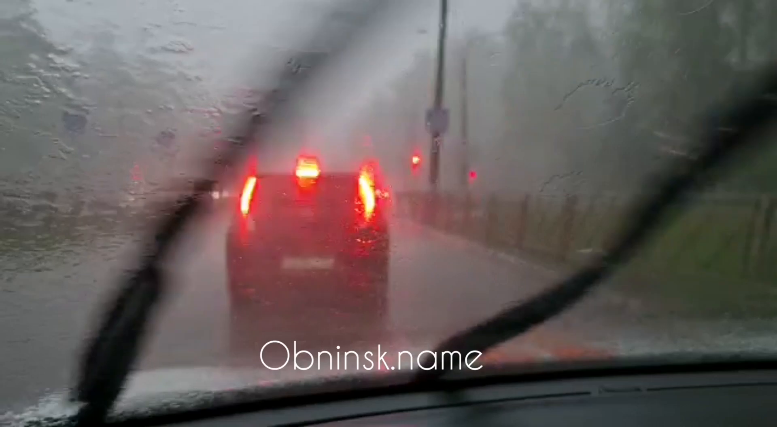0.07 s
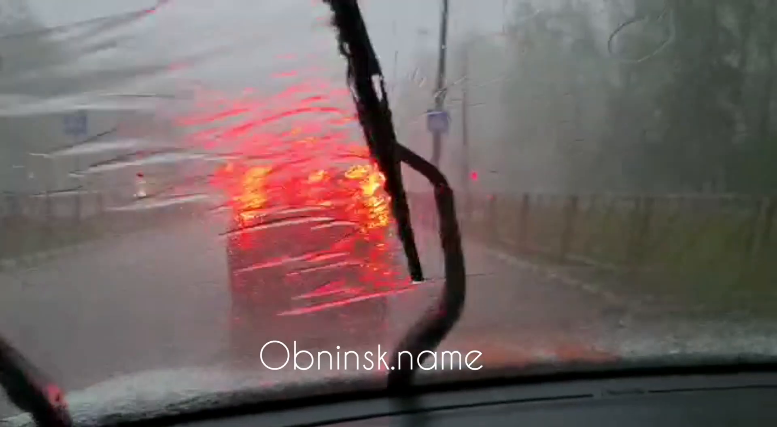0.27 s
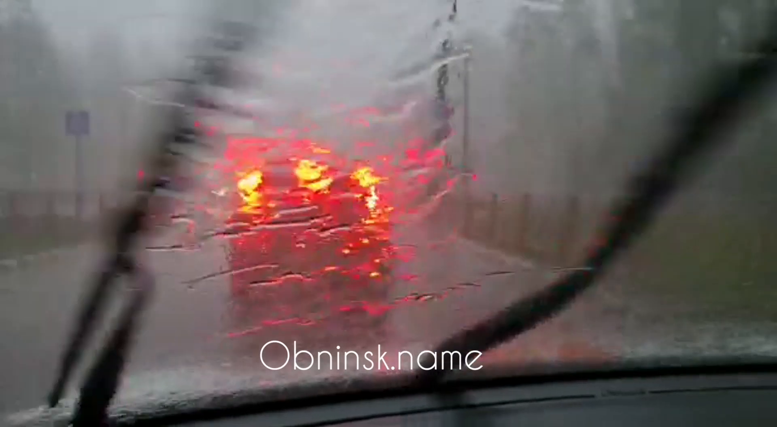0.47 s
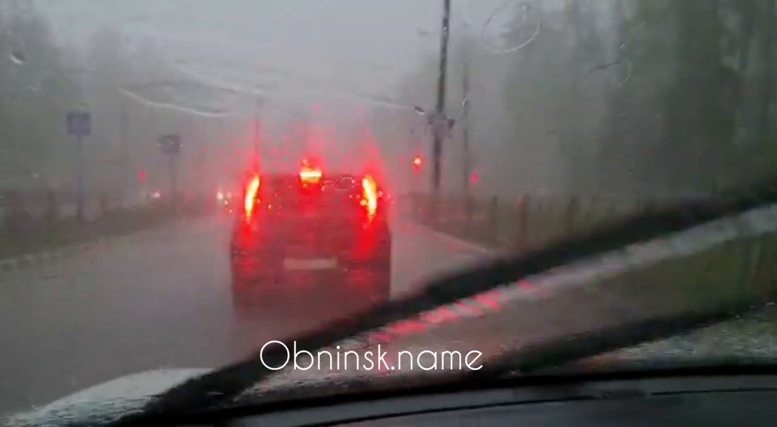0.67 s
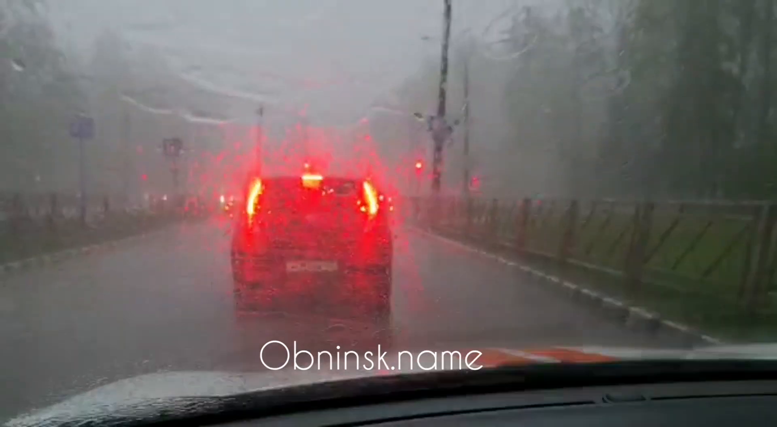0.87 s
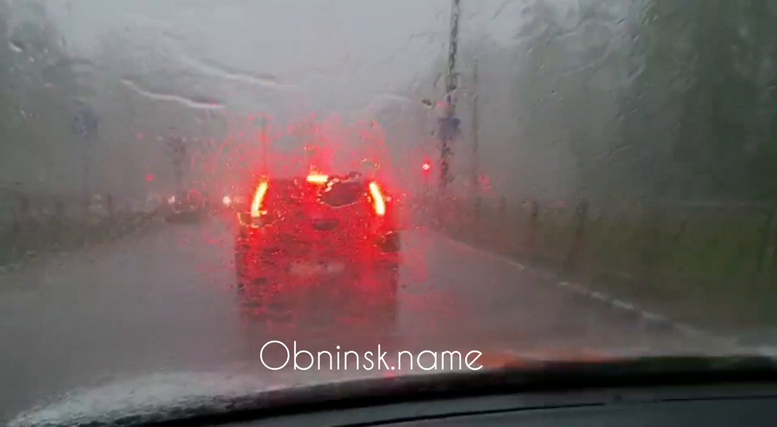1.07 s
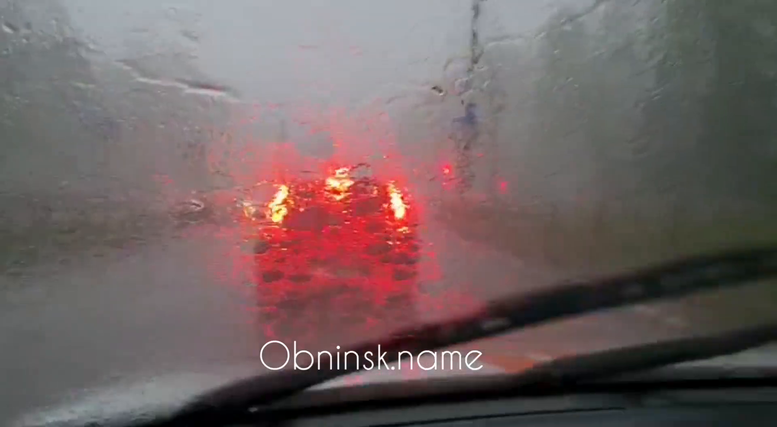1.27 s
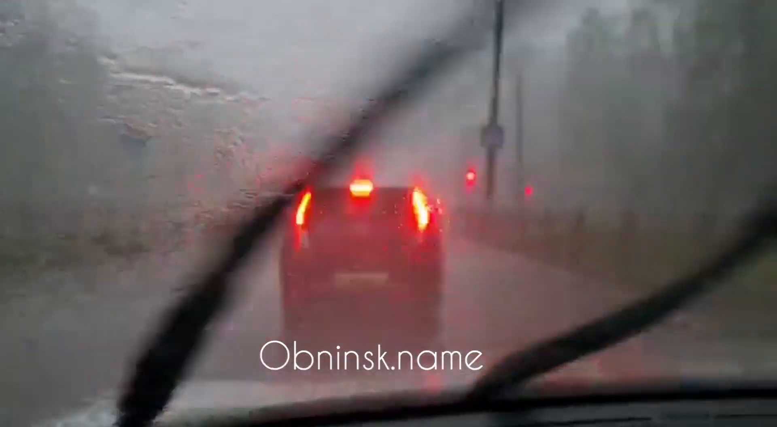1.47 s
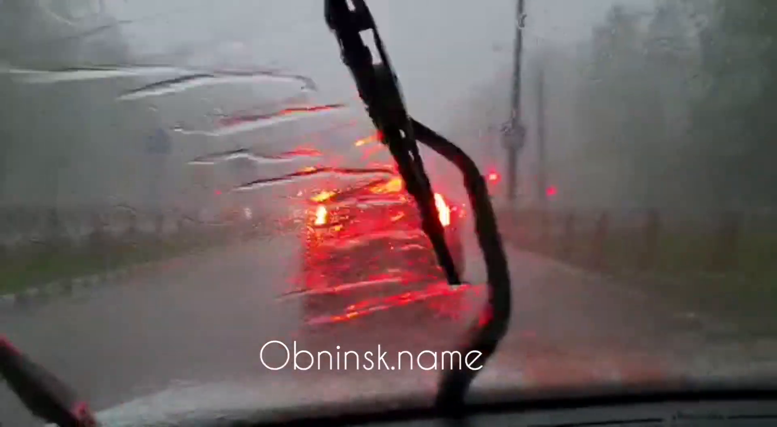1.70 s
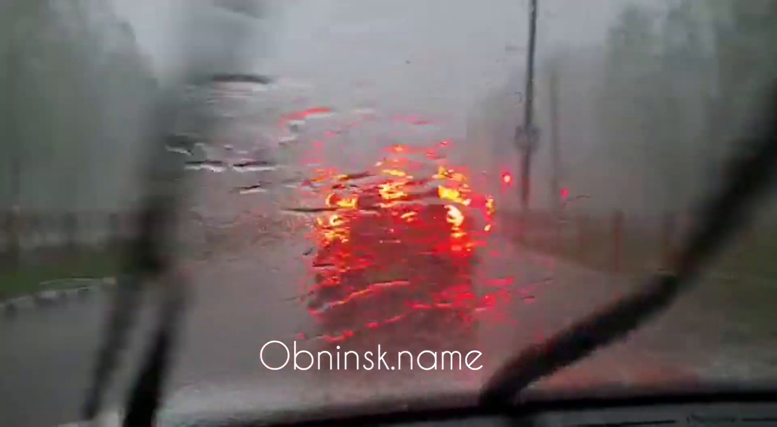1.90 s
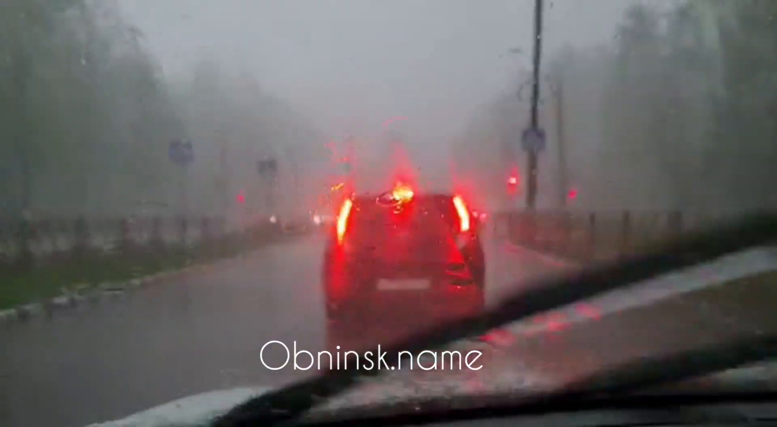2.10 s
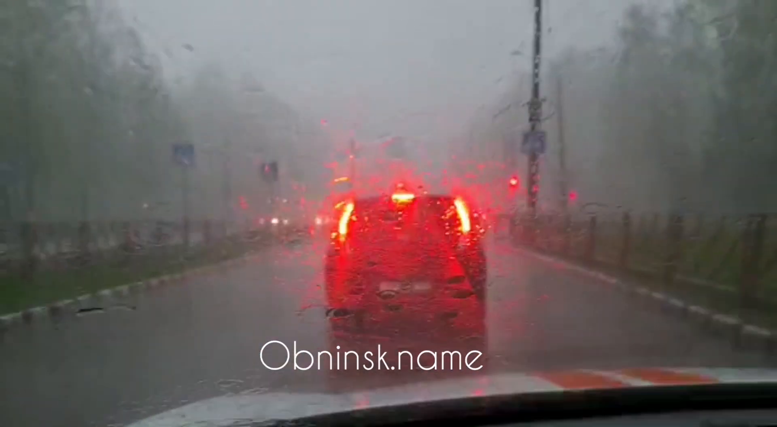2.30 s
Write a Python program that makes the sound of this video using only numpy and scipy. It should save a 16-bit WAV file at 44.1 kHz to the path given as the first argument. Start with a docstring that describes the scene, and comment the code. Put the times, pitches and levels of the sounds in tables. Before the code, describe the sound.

Heavy rain on a car, heard inside the cabin, starts abruptly at about 0.07 s: dense bright patter on glass and hollow roof drumming. From 0.6 s it thins, nearly stopping around 0.9 s with separate ticks, then surges back at 1.0 s and gradually softens to the end. Dull wiper thumps fall near 0.35, 1.06 and 1.8 s, over wavering engine hum, road rumble and faint wet hiss.

```python
"""Heavy rain on a slowly moving car, heard from inside the cabin; it thins for a moment and returns.
Random drops patter on the windshield and drum on the roof: each is a click, a crack and a short ring.
Single heavy drops tick and knock on the glass, and the wipers thump at each turn (fading low tones).
Underneath, the engine hums (two wavering tones), the road rumbles and the wet street hisses (noise)."""
import sys
import numpy as np
from scipy import signal
from scipy.fft import rfft, irfft
from scipy.io import wavfile

SR = 44100
rng = np.random.default_rng(int(sys.argv[2]) if len(sys.argv) > 2 else 0)


def wav_record(signal):
    """Record a signal, one row per channel, as 16-bit PCM in the file named by sys.argv[1]."""
    frames = np.transpose(np.atleast_2d(signal))
    bounded = np.clip(frames, -1, 1)
    # unit amplitude maps onto the largest positive 16-bit level
    quanta = np.round(bounded * 32767).astype(np.int16)
    wavfile.write(sys.argv[1], SR, quanta)


N = 103546
TIME = np.arange(N) / SR

# Strength of the rain over time, before each layer's own level is added:
# start_s, windshield_db, roof_db, fine_spatter_db, low_roof_boom_db
RAIN_STRENGTH = [(0.07, -30.0, -27.5, -42.5, -34.5), (0.18, -30.0, -29.5, -46.0, -35.0),
                 (0.27, -27.0, -27.5, -41.0, -34.5), (0.38, -28.0, -26.5, -44.0, -35.5),
                 (0.5, -29.5, -26.0, -45.0, -32.0), (0.58, -31.5, -31.0, -45.0, -37.0),
                 (0.67, -35.5, -31.5, -55.0, -37.0), (0.76, -39.0, -37.5, -54.0, -42.5),
                 (0.84, -39.5, -34.5, -56.5, -44.5), (0.92, -45.5, -45.0, -62.5, -44.5),
                 (1.02, -29.0, -34.0, -40.5, -36.0), (1.1, -29.0, -28.5, -42.0, -33.5),
                 (1.44, -31.0, -30.5, -43.5, -37.5), (1.62, -33.0, -33.5, -47.0, -37.5),
                 (1.86, -33.5, -36.0, -44.5, -35.0), (2.08, -34.5, -36.0, -47.5, -43.0),
                 (2.19, -33.5, -34.5, -45.0, -39.5), (2.33, -39.5, -35.0, -53.5, -41.5)]
# Colour of the fine spatter, also used for the ticks of big drops: frequency_hz, relative_level_db
SPATTER_COLOUR = [(200, -23), (1200, -14.5), (3300, 13), (4800, 4), (6000, 3), (7600, -1), (9000, 1.5),
                  (10500, -4), (12700, -1.5), (14000, -6), (16000, -3)]

ROOF_SPREAD_DB, ROOF_RING_DB = 1.5, 0.5  # variety of drop sizes; ring of the roof, shared with its boom


def gain_of(db):
    """Turns decibels into a plain multiplier."""
    return 10 ** (np.asarray(db) / 20)


def evened(x):
    """Scales a sound so that its average strength (rms) is 1."""
    return x / np.sqrt(np.mean(x ** 2) + 1e-20)


def read(points, hz):
    """Reads a frequency table in between its points, on a logarithmic frequency axis."""
    f, value = np.transpose(points)
    return np.interp(np.log(hz + 1), np.log(f + 1), value)


def curve(rows, order):
    """Draws one column of a time table as a smooth line, sample by sample."""
    rows = np.array(rows)
    return np.interp(TIME, rows[:, 0], rows[:, order])


def add(mix, s, sound):
    """Mixes a sound in at a time in seconds, cutting off what runs past the end."""
    part = mix[:, round(s * SR):][:, :sound.shape[-1]]
    part += sound[..., :part.shape[1]]


def coloured(x, spectrum, size=4096):
    """Filters with the given spectrum; the filter never sounds ahead of its input and has unit energy."""
    hz = abs(np.fft.fftfreq(size, 1 / SR))
    log_gain = np.log(gain_of(read(spectrum, hz)))
    # the Hilbert transform supplies the phase that puts the energy as early as possible
    response = np.exp(np.conj(signal.hilbert(log_gain)))
    taps = np.fft.ifft(response).real
    taps = taps / np.linalg.norm(taps)
    return signal.oaconvolve(x, taps[None], axes=1)[:, :N]


def paired(x):
    """Blends two unrelated channels so that they become alike, mostly in the bass."""
    # frequency_hz, left_right_likeness (0 to 1)
    likeness = [(30, 0.65), (120, 1), (250, 0.94), (450, 0.39), (800, 0.22), (1500, 0), (16000, 0.055)]
    z, hz = rfft(x), np.fft.rfftfreq(x.shape[1], 1 / SR)
    angle = np.arcsin(np.clip(read(likeness, hz), -1, 1)) / 2
    blend = np.cos(angle) * z + np.sin(angle) * z[::-1]
    return irfft(blend, x.shape[1])


def impact(ring_db, size=6144):
    """One spot struck by a drop: direct click, brief crack of the panel, ring of the cabin; unit energy."""
    # How long panel and cabin ring: frequency_hz, time_to_fade_60_db_s
    ring_time = [(60, 0.18), (350, 0.39), (1000, 0.024), (3000, 0.042), (8000, 0.067), (16000, 0.075)]
    lag_s, lag_spread_s = .00043, .00012
    crack_decay_s, crack_db, direct_db = 0.0021, -1, -4.0
    t = np.arange(size) / SR

    # the far side hears the drop a little later
    lag = lag_s * rng.choice([-1, 1]) + lag_spread_s * rng.standard_normal()
    age = t - np.array([[abs(lag) + lag], [abs(lag) - lag]]) / 2
    direct = np.sinc(age * SR) * gain_of(direct_db)
    crack = evened(rng.standard_normal((2, size)) * (age > 0) * np.exp(-t / crack_decay_s))

    # the ring is noise that fades at its own speed in every frequency band
    hz, when, z = signal.stft(rng.standard_normal((2, size)), SR, nperseg=128)
    t60 = read(ring_time, hz)[:, None]
    fading = z * gain_of(-60 * when / t60) / np.sqrt(t60)
    ring = signal.istft(fading, SR)[1][:, :size]

    diffuse = paired(gain_of(crack_db) * crack + gain_of(ring_db) * evened(ring))
    return evened(direct + diffuse / np.sqrt(size)) / np.sqrt(size)


def shower(level_db, per_s, spread_db, ring_db, spectrum, count=20):
    """Random drops on many spots of a panel; in a lull they are both fewer and softer."""
    thinning = .33  # share of a lull that comes from fewer drops
    density = gain_of(level_db - level_db.max()) ** (2 * np.clip(thinning, 0, 1))
    chance, spot = rng.random(N), rng.integers(0, count, N)
    size_db = spread_db * np.minimum(rng.exponential(1, N), 3.6)
    size = gain_of(size_db) * rng.choice([-1, 1], N)
    # per_s is the number of drops per second at the height of the downpour
    falls = chance < density * per_s / SR
    drops = evened(size * falls / np.sqrt(density)) * gain_of(level_db)

    hits = np.zeros((2, N))
    for k in range(count):
        on_this_spot = (drops * (spot == k))[None]
        hits += signal.oaconvolve(on_this_spot, impact(ring_db), axes=1)[:, :N]
    return coloured(hits, spectrum)


def road():
    """Tyre rumble through the body: steady noise, strongest in the bass."""
    # frequency_hz, relative_level_db
    road_colour = [(10, 6), (26, -29), (48, 17.5), (70, 1), (115, 3.5), (200, -11.5), (400, -7.5),
                   (1000, -18.5), (3000, -43), (16000, -103)]
    level_db = -39.0
    return gain_of(level_db) * evened(coloured(paired(rng.standard_normal((2, N))), road_colour))


def wash():
    """Smooth hiss of the rain on the street, muffled by the windows: steady filtered noise."""
    # frequency_hz, relative_level_db
    wash_colour = [(100, -4), (500, 5), (1500, -9), (3200, -1.5), (5000, -25), (9000, -29), (11000, -31),
                   (16000, -30)]
    level_db = -49.5
    return gain_of(level_db) * evened(coloured(rng.standard_normal((2, N)), wash_colour))


def engine():
    """Engine hum: a wavering firing tone and a second tone at half its pitch."""
    # Hum in the cabin before the overall hum level is added: start_s, level_db
    hum_level = [(0.07, -29), (0.32, -40), (0.37, -22), (0.41, -35), (0.56, -25.5), (0.59, -44),
                 (0.73, -30), (0.95, -49), (0.96, -33.5), (1.92, -40), (1.99, -30), (2.02, -48), (2.3, -35),
                 (2.34, -39)]
    firing_hz, hum_db, half_order_db = 46.46, -3, -0.5
    wander_share = 0.027  # typical (rms) pitch drift as a share of the firing pitch
    # many slow waves with random starting points make an irregular drift
    slow_waves = [np.sin(2 * np.pi * (f * TIME + rng.random())) for f in np.geomspace(.5, 8, 20)]
    wander = evened(sum(slow_waves))
    turn = 2 * np.pi * np.cumsum(firing_hz * (1 + wander_share * wander)) / SR
    tones = np.sin(turn) + gain_of(half_order_db) * np.sin(turn / 2)
    return gain_of(curve(hum_level, order=1) + hum_db) * evened(tones)


def wipers():
    """The blades flip over at each end of the sweep: a dull thump with a ring of the linkage."""
    # Wiper turns: start_s, level_db, pitch_hz, linkage_ring_relative_db
    turns = [(0.353, -29, 59, -8), (1.057, -22.5, 99, -1.5), (1.786, -25, 60, -4)]
    rise_s, linkage_hz, decay_s = 0.0064, 178.5, 0.032
    out, t = np.zeros((2, N)), np.arange(SR // 2) / SR
    swell_and_fade = np.minimum(t / rise_s, 1) * np.exp(-np.maximum(t - rise_s, 0) / decay_s)
    for s, db, hz, linkage_db in turns:
        thump = np.sin(2 * np.pi * hz * t)
        linkage = gain_of(linkage_db) * np.sin(2 * np.pi * linkage_hz * t)
        add(out, s, gain_of(db) * (thump + linkage) * swell_and_fade)
    return out


def big_drops():
    """Single heavy drops on the windshield: a bright tick and a knock of the glass."""
    # Big drops, before the overall levels are added: start_s, tick_db, knock_db
    drop_list = [(0.1015, -24, -27), (0.1551, -22, -15.5), (0.7099, -29, -22.5), (0.7456, -35, -45),
                 (.778, -29.5, -38), (0.819, -32, -46), (0.8517, -38, -34), (.943, -28, -29),
                 (1.0055, -22, -38), (1.0205, -30, -26), (1.073, -20, -16), (1.1708, -22, -23),
                 (1.35, -24.5, -31), (1.4814, -18.5, -16), (1.835, -23.5, -26), (1.8675, -24, -33),
                 (1.8795, -21.5, -49), (1.9214, -36, -43), (1.957, -41, -20), (2.138, -29, -29),
                 (2.155, -23.5, -37), (2.2005, -21, -29), (2.2355, -38, -40), (2.267, -31, -43)]
    # Colour of the knock: frequency_hz, relative_level_db
    knock_colour = [(100, -25), (600, 12), (1400, -19), (2000, -1), (3500, 5), (4500, -3), (7000, -30),
                    (16000, -44)]
    all_ticks_db, all_knocks_db, ring_db = 16.0, 15.5, -5.0
    ticks, knocks = np.zeros((2, 2, N))
    for s, tick_db, knock_db in drop_list:
        add(ticks, s, gain_of(tick_db + all_ticks_db) * impact(ring_db))
        add(knocks, s, gain_of(knock_db + all_knocks_db) * impact(ring_db))
    return coloured(ticks, SPATTER_COLOUR) + coloured(knocks, knock_colour)


def roof_boom():
    """Low boom of the roof under the drops, struck on ten spots."""
    # frequency_hz, relative_level_db
    boom_colour = [(30, -27.5), (80, -18.5), (118, -2.5), (138, -6.5), (182, 0.5), (220, -6), (400, -22.5),
                   (1500, -26), (16000, -75)]
    level_db = curve(RAIN_STRENGTH, order=4) + 0.5
    return shower(level_db, 640, ROOF_SPREAD_DB, ROOF_RING_DB, boom_colour, count=10)


def fine_spatter():
    """Fine bright spatter of drops."""
    level_db = curve(RAIN_STRENGTH, order=3) + 7.5
    return shower(level_db, per_s=1100, spread_db=4.0, ring_db=-1, spectrum=SPATTER_COLOUR)


def roof_drumming():
    """Drops drumming on the roof, which sounds mostly between 200 and 1300 Hz."""
    # frequency_hz, relative_level_db
    roof_colour = [(60, -37.5), (200, -10), (255, -6), (292, -1.5), (328, -5), (352, 3), (377, 2.5),
                   (400, 1.5), (445, -3), (580, -1), (720, -3.5), (900, -8.5), (1300, -9), (4000, -48.5),
                   (16000, -79)]
    level_db = curve(RAIN_STRENGTH, order=2) + 1.9
    return shower(level_db, 1500, ROOF_SPREAD_DB, ROOF_RING_DB, roof_colour)


def windshield_patter():
    """Dense patter of drops on the glass, struck on 36 spots."""
    # frequency_hz, relative_level_db
    glass_colour = [(100, -46), (400, -7), (700, -6.5), (950, -2), (1250, -1), (1700, 1.86), (2250, -5),
                    (2950, 0), (3600, -5), (4200, -10.5), (5000, -14), (7000, -21), (9000, -22),
                    (10500, -25.5), (16000, -37)]
    level_db = curve(RAIN_STRENGTH, order=1) + 2.5
    return shower(level_db, per_s=3000, spread_db=4, ring_db=-0.5, spectrum=glass_colour, count=36)


def scene():
    """Everything heard in the cabin."""
    background = road() + wash() + engine() + wipers()
    rain = roof_boom() + fine_spatter() + roof_drumming() + windshield_patter()
    return background + big_drops() + rain


def record(dry):
    """Left-right colour of the microphones, an abrupt start and a limit on the highest treble."""
    # frequency_hz, left_minus_right_db
    tilt = [(30, -2), (90, -.6), (180, 4), (350, 0), (700, -1), (1400, -2), (2800, 0.9), (5600, -3.3),
            (9500, 2), (15000, 0)]
    start_s, edge_hz = .069, 15850
    tilt_db = read(tilt, np.fft.rfftfreq(N, 1 / SR))
    x = irfft(rfft(dry) * gain_of(np.array([tilt_db, -tilt_db]) / 2), N)
    x = x * (TIME > start_s)
    low_pass = signal.firwin(701, edge_hz, window=("kaiser", 9), fs=SR)
    return signal.oaconvolve(x, low_pass[None], "same")


dry = scene()
out = record(dry)
wav_record(out)
```